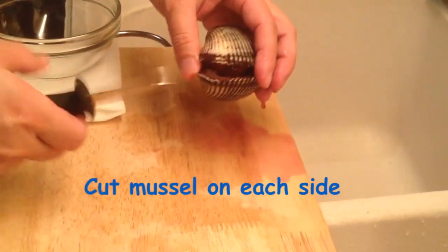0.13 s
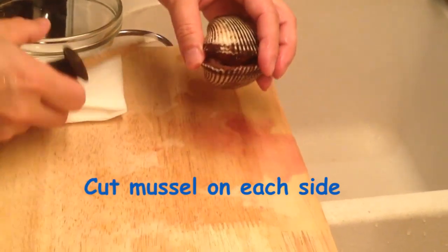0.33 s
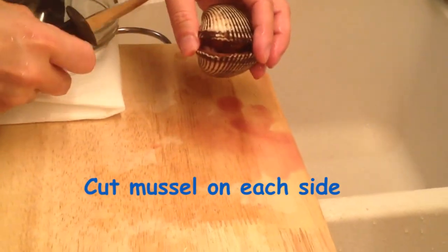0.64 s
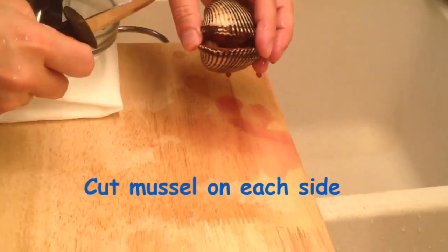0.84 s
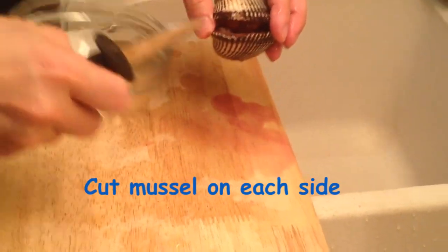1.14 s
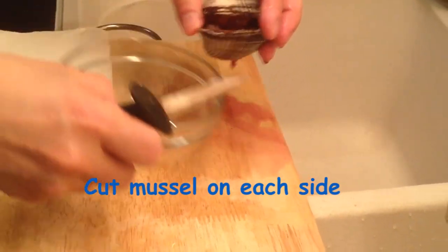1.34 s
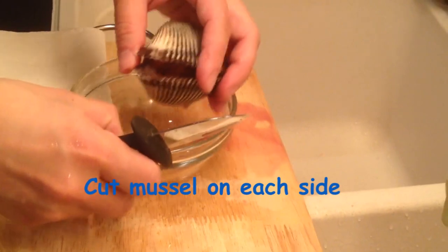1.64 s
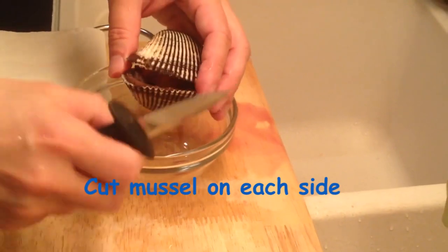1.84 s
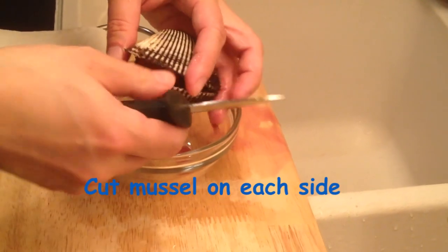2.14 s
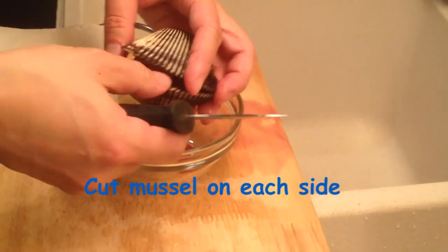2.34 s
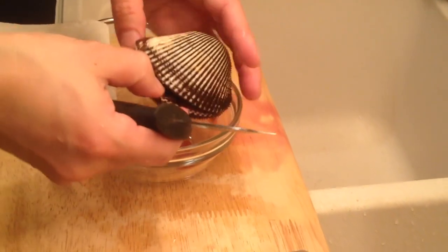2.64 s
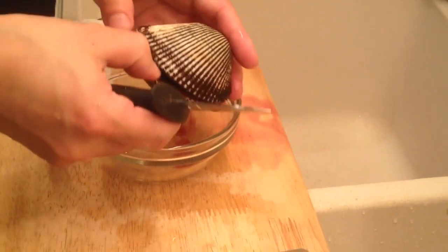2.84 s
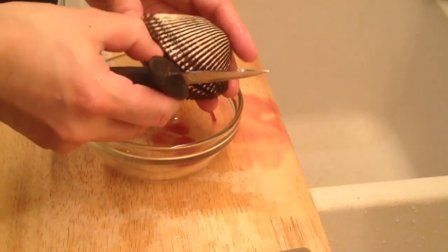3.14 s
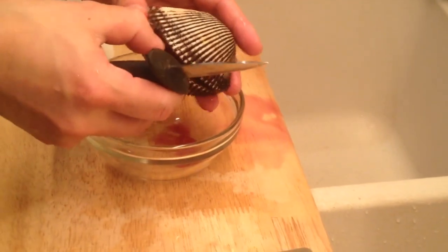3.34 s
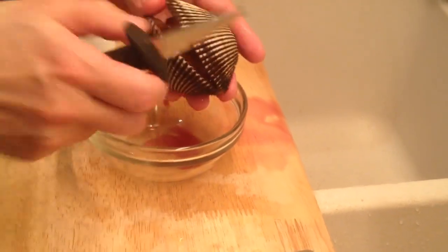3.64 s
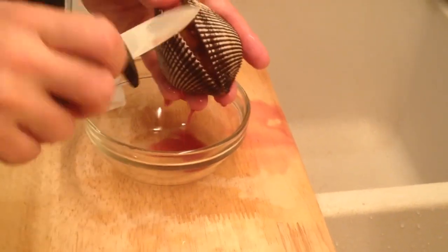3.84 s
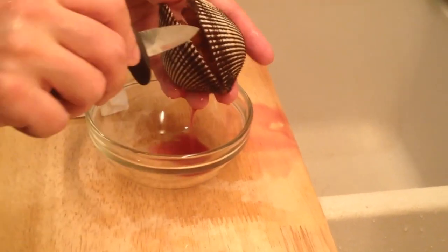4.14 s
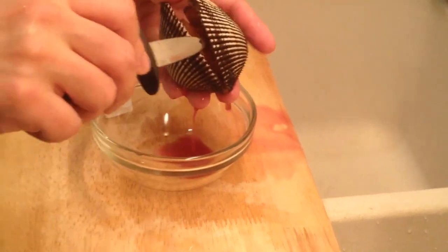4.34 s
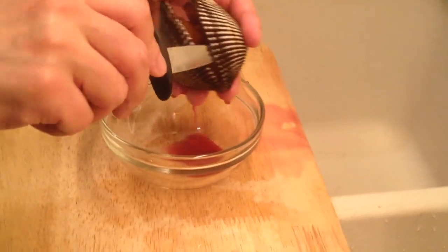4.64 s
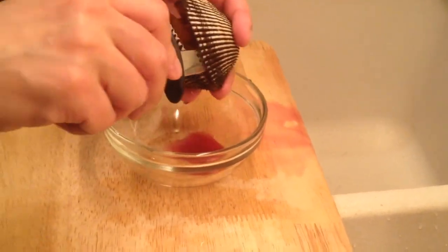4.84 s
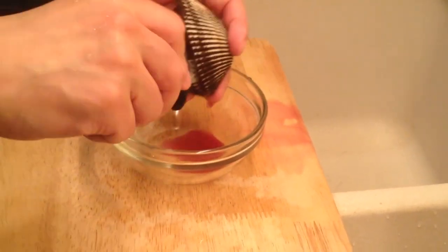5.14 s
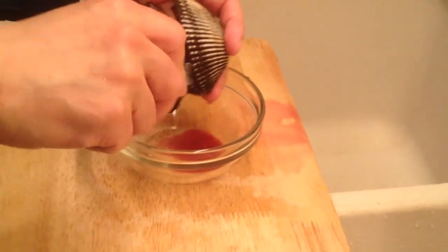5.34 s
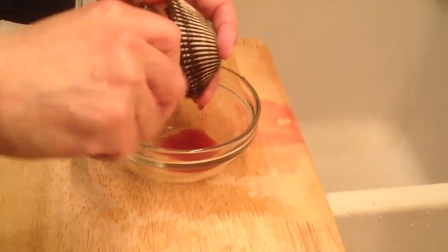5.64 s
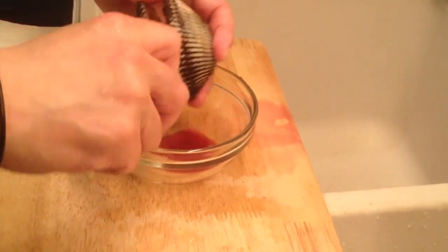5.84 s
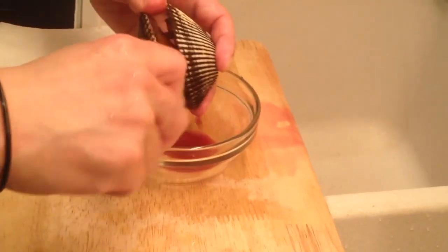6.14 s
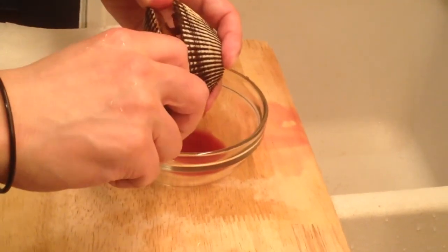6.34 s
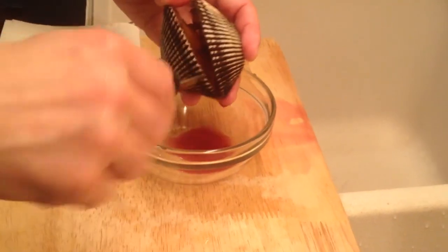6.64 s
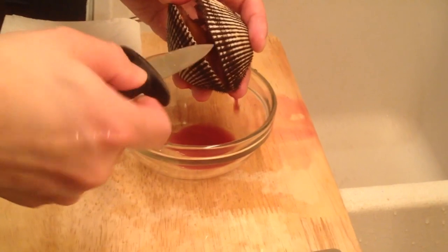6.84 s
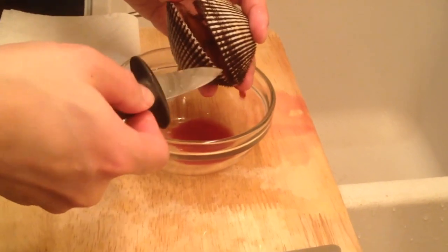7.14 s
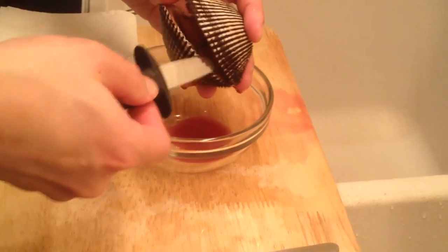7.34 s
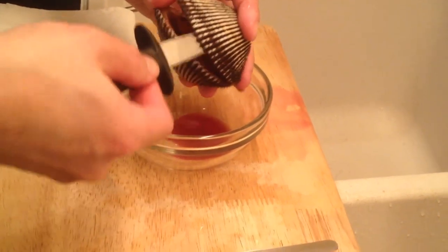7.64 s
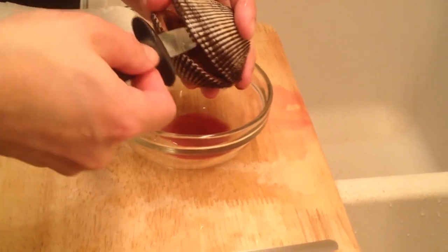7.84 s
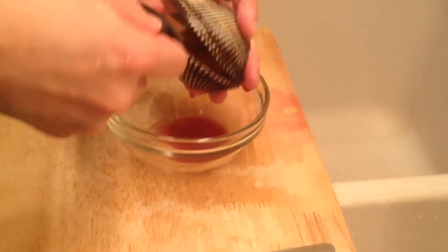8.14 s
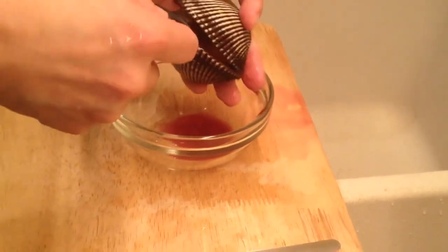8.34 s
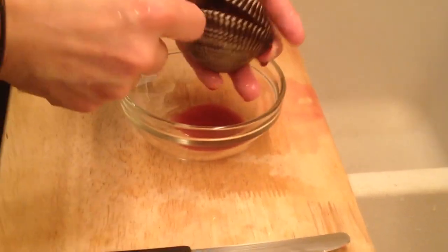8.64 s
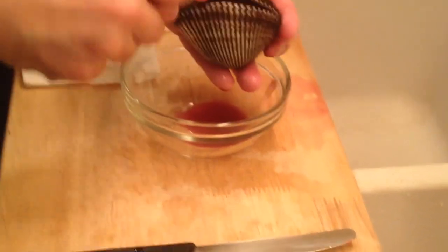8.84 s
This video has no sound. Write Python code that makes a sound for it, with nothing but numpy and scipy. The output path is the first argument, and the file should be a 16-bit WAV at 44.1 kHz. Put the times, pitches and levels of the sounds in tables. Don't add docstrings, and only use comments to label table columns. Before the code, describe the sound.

Small, dry, bright shell sounds heard close up over low room noise and a faint fridge whine. One click opens, two hard woody knocks follow, then near silence with tiny wet smacks. The knife scratches and snaps irregularly, slips loudly, and a duller knock follows. Slight squeaks precede the densest crunchy scrape, and a few hollow taps fade out. Short echoes return from hard kitchen walls.

```python
import sys
import numpy as np
from scipy import signal
from scipy.io import wavfile
from scipy.ndimage import uniform_filter1d

SR = 44100
rng = np.random.default_rng(int(sys.argv[2]) if len(sys.argv) > 2 else 0)


def ratio(d):
    e = np.asarray(d, float) / 20
    return 10 ** e


def bounce(signal):
    frames = np.transpose(np.atleast_2d(signal))
    limited = np.clip(frames, -1, 1)
    pcm = np.round(limited * 32767).astype(np.int16)
    wavfile.write(sys.argv[1], SR, pcm)


N = 396900


def evened(x):
    return x / np.sqrt(np.mean(x ** 2) + 1e-20)


def read(points, hz):
    f, value = np.transpose(points)
    return np.interp(np.log(hz + 1), np.log(f + 1), value)


def add(mix, s, sound):
    part = mix[..., round(s * SR):][..., :sound.shape[-1]]
    part += sound[..., :part.shape[-1]]


def filtered(x, order, hz, kind):
    return signal.sosfilt(signal.butter(order, hz, kind, fs=SR, output="sos"), x)


def resonate(x, hz, width):
    r = np.exp(-np.pi * max(width, 1) / SR)
    pole = r * np.exp(2j * np.pi * hz / SR)
    return np.sqrt(1 - r * r) * 2 * signal.lfilter([1], [1, -pole], x).real


def steep(x, hz, width):
    once = resonate(x, hz, width)
    twice = resonate(once, hz, width)
    return twice * np.linalg.norm(once) / np.linalg.norm(twice)


def colour(x, spectrum):
    hz = abs(np.fft.fftfreq(2048, 1 / SR))
    log_gain = np.log(ratio(read(spectrum, hz)) + 1e-5)
    response = np.fft.ifft(np.exp(np.conj(signal.hilbert(log_gain)))).real
    return signal.oaconvolve(x, response / np.linalg.norm(response))[:len(x)]


def waver(count, size):
    once = uniform_filter1d(rng.standard_normal(count), size=size)
    return evened(uniform_filter1d(once, size=size))


def grains(count, per_s, spread_db, smooth):
    draw = rng.random((count, 2))
    sizes = ratio(-spread_db * np.log(draw[:, 1] * .98 + .02))
    sparse = (draw[:, 0] < per_s / SR) * sizes
    return rng.standard_normal(count) * (smooth + evened(sparse))


def clumped(x, patchy_db):
    z = signal.stft(x, nperseg=256, noverlap=192)[2]
    patches = uniform_filter1d(rng.standard_normal(z.shape[::-1]).T, size=4, axis=0)
    patches = uniform_filter1d(patches, size=9, axis=1)
    return signal.istft(z * ratio(patchy_db * evened(patches)), nperseg=256, noverlap=192)[1][:N]


def stroke(db, swell, fade, blade_db):
    range_db = 20.0
    t = np.arange(-1.5 * swell, 1.5 * fade, 1 / SR)
    away = np.maximum(-t / swell, t / fade)
    level_db = db - range_db * away
    grit_db = -4.5 - 6 * np.maximum(t / fade, 0)
    levels = np.array([level_db, level_db + blade_db, level_db + grit_db])
    rub = evened(grains(count=len(t), per_s=1500, spread_db=1.0, smooth=0.93))
    return -t[0], rub * ratio(levels - 3.5)


def knife():
    # start in
    # seconds, shell level in dB, low ring and grit in dB relative to it, shell pitch in Hz
    catches = [(0.0532, -23.5, -25, -5, 3220), (0.4667, -46, -9, -8, 3500),
               (4.6668, -36, -15, -1, 4760), (4.6872, -41.5, -3, -20, 4400),
               (4.804, -39.5, -3, -6, 5900), (4.811, -43, -3, -1.5, 6300), (4.875, -40, -6, -19, 2960),
               (4.9031, -31.5, -9, -25, 2800), (4.9236, -34, -12, -19, 6460),
               (4.954, -36.5, -13, -9, 2760), (5.018, -47, -23, -0.5, 2900),
               (5.324, -28, -11, -3.5, 6500), (5.434, -28.5, -8, -14, 2700),
               (5.5547, -23.5, -13, -20, 6430), (5.6467, -31, 2.5, -9.5, 6530),
               (5.6997, -38.5, 3, -17, 4040), (5.777, -25.5, 3, -32.5, 2830),
               (5.9204, -32, -11.5, -11, 3150), (6.0457, -31.5, -9, -13.5, 2340),
               (6.1602, -33, -14, -10.5, 3080), (6.1645, -39.5, 3.5, -13, 3080),
               (6.183, -27, -24, -17, 2900), (6.208, -10, -15.5, -9, 3350),
               (6.2815, -34, -1.5, -11, 2950), (6.6288, -47.5, -7, -7, 4730),
               (7.0337, -48, -24, -14, 3450), (7.1065, -46.5, -21, -20, 3180),
                     (7.5477, -39.5, -35.5, -9, 3220), (7.576, -37.5, -15, -20.5, 3200),
                     (7.703, -34.5, -4, 3.5, 5900), (7.7442, -27, -2, -26, 3120),
                     (7.7683, -24.5, 4, -28, 3430), (7.8124, -23.5, -2, -28, 7500),
                     (8.0448, -20.5, 0.5, -26, 4340), (8.0602, -20, 6, -24, 4030),
                     (8.0747, -13.5, -8, -11, 3120), (8.0869, -20, -17, 0.5, 7050),
                     (8.0956, -14, -12, -22.5, 6850), (8.184, -22.5, -14, -2, 4870),
                     (8.3588, -33, -18, -23, 2600), (8.529, -33, -30, -4, 4900),
                     (8.555, -49, -20, -4, 4840), (8.7377, -35.5, -13.5, -8, 2400),
                     (8.821, -50.5, 4.5, -12, 2360), (8.4089, -21.5, -46, -18.5, 4310)]
    # time in seconds, pitch in Hz
    hollow = [(0.3, 2210), (4.66, 2126), (4.7, 1850), (4.9, 1850), (5.4, 1820), (5.64, 1758), (5.9, 1821),
              (7.76, 1790), (8.05, 1740), (8.085, 1763), (8.1, 1490), (8.53, 1374), (8.73, 2310),
              (8.82, 1235)]
    # hardest push in seconds, level in dB,
    # swell and fade in seconds, blade ring in dB relative to the level
    drags = [(0.472, -64.5, 0.0065, 0.71, -19), (4.6, -55, 0.035, 0.047, -6),
             (4.668, -47, 0.046, 0.091, -12), (4.812, -49, 0.034, 0.058, -10),
             (4.904, -46, 0.045, 0.12, -2.5), (5.138, -50, 0.081, 0.084, -2.5),
             (5.192, -44.5, 0.011, 0.065, -6.5), (5.342, -41.5, 0.021, 0.035, 2),
             (5.561, -46, 0.033, 0.0048, 0), (5.78, -42.5, 0.021, 0.07, 4.5), (6.163, -44, .016, 0.11, 5),
             (6.213, -29.5, 0.0098, 0.013, -13), (6.302, -56, .04, 0.011, 15),
             (7.034, -59, 0.011, 0.059, -19), (7.115, -46.5, 0.022, 0.081, -11),
             (7.25, -70, 0.21, 0.14, -2), (7.547, -51, 0.0046, 0.058, 6),
             (7.577, -46.5, 0.0058, 0.029, -15.5), (7.7, -54.5, 0.042, 0.15, -1.5),
             (7.746, -33, 0.0035, .05, -12), (7.791, -41.5, 0.049, 0.046, -2),
             (8.049, -32.5, 0.004, 0.024, 7), (8.093, -18.5, 0.024, 0.015, -34),
             (8.976, -56.5, 0.13, .1, -8)]
    # frequency in Hz, width in Hz, level in dB
    blade_modes = [(1790, 36, -11.5), (1850, 33, -10.5), (2300, 210, -12.5)]
    # frequency in Hz, level in dB per Hz
    shell_colour = [(900, -15.5), (1500, -15), (2100, -10.5), (2500, -21), (2950, -1), (3600, -15.5),
                    (4700, -4.5), (5600, -11.5), (6500, -2), (7200, -4.5), (7900, -8), (8900, -21),
                    (11000, -39.5), (16000, -46.5)]
    # frequency in Hz, level in dB per Hz
    grit_colour = [(6500, -13.5), (7800, -2.5), (8900, -12.5), (10500, -11.5), (13500, -13.5), (14600, -21),
                   (15600, -23.5), (16300, -38)]
    drive, spot = np.zeros((3, N)), np.zeros(N)
    t = np.arange(4000) / SR
    for s, db, low_db, grit_db, hz in catches:
        slip = evened(grains(count=len(t), per_s=2600, spread_db=0.0, smooth=2.7))
        slip = slip * np.minimum(t / 0.00038, 1) * ratio(db - 10.5 - 26 * t / 0.023)
        add(drive, s - .0004, slip * ratio(np.array([[0], [-99], [grit_db]])))
        add(spot, s - .0004, ratio(-5.5) * resonate(slip, hz, 220))
        low_hz = np.interp(s, *np.transpose(hollow))
        beat = 1 + 0.36 * np.cos(2 * np.pi * 115 * (t - .004))
        hum = np.sin(2 * np.pi * low_hz * t) * beat
        hum = hum + 0.26 * resonate(rng.standard_normal(len(t)), 1.01 * low_hz, 260)
        decay = np.exp(-(t / 0.011) ** 4) + 0.21 * np.exp(-t / 0.021)
        add(spot, s, ratio(db + low_db - 5.5) * hum * np.minimum(t / 0.0018, 1) * decay)
    for s, *row in drags:
        lead, rub = stroke(*row)
        add(drive, s - lead, rub)
    blade = sum(ratio(db) * resonate(drive[1], hz, width) for hz, width, db in blade_modes)
    shell = ratio(-3.0) * colour(drive[0], shell_colour)
    grit = ratio(2.0) * colour(drive[2], grit_colour)
    sound = clumped(shell + blade + grit, patchy_db=3.5)
    return filtered([sound, spot], 4, 1200, "high")


def ticks():
    # start in seconds, peak in dB, pitch in Hz
    snaps = [(.0559, -29, 6100), (4.5982, -40, 5000), (4.6559, -37, 5000), (4.6694, -33, 5000),
             (4.6869, -31, 4500), (4.814, -38, 8000), (4.8778, -42, 5000), (4.9226, -46, 6500),
             (4.9561, -36, 9000), (5.0192, -34, 7000), (5.079, -41, 7000), (5.1219, -41, 6000),
             (5.2142, -55, 6000), (5.3249, -28.5, 6500), (5.3636, -42, 5000), (5.4352, -67, 4000),
             (5.5554, -31.5, 6500), (5.648, -22, 5930), (5.7014, -42, 4000), (6.0513, -42.5, 6500),
             (6.1589, -38.5, 8000), (6.2763, -44, 6000), (6.2822, -28.5, 3500), (6.2849, -37, 4000),
             (7.1434, -41, 6000), (7.548, -44, 7000), (7.6943, -47, 5000), (7.7062, -32, 7000),
             (7.7331, -42, 6500), (7.7454, -25.5, 6000), (7.7704, -24.5, 8000), (7.7747, -25, 7500),
             (7.813, -27, 5000), (7.818, -29, 7000), (8.0469, -25.5, 5950), (8.0743, -14, 4000),
             (8.0837, -18, 4000), (8.0907, -12, 6000), (8.0989, -11, 6000), (8.18, -37, 4500),
             (8.184, -23.5, 6000), (8.4138, -23, 5000), (8.5355, -26.5, 6000), (8.5571, -28, 4500),
             (8.567, -33, 6000), (8.7506, -42.5, 4000), (8.963, -47.5, 7000), (8.9762, -40, 7000)]
    out, t = np.zeros(N), np.arange(400) / SR
    for s, db, hz in snaps:
        snap = np.cos(2 * np.pi * hz * t) + 0.79 * rng.standard_normal(len(t))
        snap = filtered(snap * np.exp(-t / 0.00021), 2, 2200, "high")
        add(out, s, ratio(db - 2.0) * snap / abs(snap).max())
    return out


def taps():
    # start in seconds, level in dB
    hits = [
        (0.0543, -42),
        (8.3562, -34),
        (8.4073, -25),
        (8.5307, -33),
        (8.7371, -41.5),
    ]
    # frequency in Hz, level in dB, T60 in seconds
    spots = [
        [(1960, -2.5, 0.18), (2950, -14, 0.081), (3550, -10, 5.0), (4080, 2, 0.1), (5265, -21, 0.34),
         (7047, 3, 0.072), (7250, -12, 0.11), (8430, -6, 0.036), (9220, -9, 0.027), (10310, -16, 0.18)],
        [(2660, 0, 0.034), (3460, -21, 0.034), (4100, -3.5, 0.03), (4800, -5, 0.023), (5060, -28, 0.18),
         (5534, -27, 0.026), (6697, -12, 0.021), (6842, -32, 5.0)],
        [(1040, -17, 0.095), (2250, -32, 5.0), (2596, -6, 0.11), (2880, -7, 0.19), (4020, -6, 0.044),
         (4940, -19, 0.15), (5615, -29, 0.51), (6067, -8, 0.41), (6519, -26, 0.36), (7140, -22, 0.029),
         (8048, -32, 0.052), (8748, -43, 0.67)],
        [(1380, -10, 0.1), (2750, -4.5, 0.038), (4400, -3, 0.02), (4721, -9, 0.062), (4800, -12, 0.045),
         (6300, -1.5, 0.024), (7090, -9, 0.077), (7700, -6, 0.099), (8250, -7, 0.019), (8942, -20, 0.056)],
        [(1240, -7.5, 0.072), (1630, -6, 0.042), (1960, -16, 0.15), (2330, 4.5, 0.073), (2600, -11, 0.067),
         (4030, -3.5, 0.092), (5840, -25, 0.11), (8909, -12, 0.039)],
    ]
    damped_t60 = .055
    out, t = np.zeros(N), np.arange(6000) / SR
    for (s, db), modes in zip(hits, spots):
        for hz, mode_db, t60 in modes:
            flutter = 0.5 * waver(count=len(t), size=60)
            ring = np.sin(2 * np.pi * hz * t) + flutter * np.cos(2 * np.pi * hz * t)
            decay = ratio(db + mode_db - 70 * t / min(t60, damped_t60))
            add(out, s, decay * np.minimum(t / 0.00035, 1) * ring)
    return out


def wet():
    # start in seconds, level in dB,
    # frequency in Hz, width in Hz, length in seconds
    smacks = [(0.371, -70.5, 10550, 1200, 0.06), (.392, -69.5, 8050, 3000, 0.0078),
              (2.122, -67, 3980, 1200, 0.0051), (2.239, -71, 6200, 890, 0.012),
              (2.242, -63.5, 1790, 200, 0.0074), (2.378, -65, 1810, 198, 0.0089),
              (2.443, -74, 12030, 4000, 0.0073), (3.124, -68.5, 6200, 1193, 0.016),
              (3.341, -67, 6370, 1200, 0.0086), (3.35, -69, 10300, 3000, 0.01),
              (3.388, -71.5, 6500, 1490, 0.0051), (3.773, -72, 6980, 3040, 0.0086),
              (4.392, -53.5, 5500, 1400, 0.0065), (4.395, -70.5, 12000, 5030, 0.0063),
              (6.548, -50.5, 2896, 121.6, 0.015), (6.55, -65, 5900, 4150, 0.017),
              (7.439, -59.5, 3010, 250, 0.038)]
    crack_s = (.054, 3.12, 4.89, 6.185, 6.2075, 7.105, 7.11, 8.022, 8.085, 8.087, 8.3, 8.556, 8.567, 8.737,
               8.97)
    # level in dB, frequency in Hz, width in
    # Hz, length in seconds
    cracks = [(-43, 7600, 600, 0.0049), (-65.5, 1750, 220, .012), (-53.5, 2050, 470, 0.15),
              (-38, 2950, 410, 0.0072), (-29, 3400, 630, 0.0047), (-55, 3080, 230, 0.033),
              (-60, 1970, 250, 0.035), (-60, 3900, 4700, 0.025), (-38, 1000, 800, 0.0094),
              (-26.5, 7030, 700, 0.015), (-60.5, 6600, 1100, 0.011), (-41, 4900, 5500, 0.0018),
              (-49.5, 7300, 4200, 0.0016), (-50.5, 1440, 1300, 0.015), (-72, 11000, 1550, 0.014)]
    # time in seconds, pitch in Hz, level in dB
    squeak = [
        (6.88, 4720, -81.5),
        (6.999, 5070, -77),
        (7.05, 5050, -87),
        (7.12, 5120, -63),
        (7.25, 5430, -78),
        (7.3, 5240, -79),
        (7.39, 5250, -69),
        (7.41, 5100, -87),
    ]
    out, t = np.zeros(N), np.arange(3000) / SR
    for s, db, hz, width, length in smacks + [(s, *row) for s, row in zip(crack_s, cracks)]:
        puff = rng.standard_normal(len(t)) * np.minimum(t / 0.00059, 1) * np.exp(-(t / length) ** 2)
        add(out, s, ratio(db) * steep(puff, hz, width))
    s, hz, db = np.transpose(squeak)
    t = np.arange(s[0], s[-1], 1 / SR)
    flutter = 1 + 0.66 * waver(count=len(t), size=500)
    tone = flutter * np.sin(2 * np.pi * np.cumsum(np.interp(t, s, hz)) / SR)
    level = ratio(np.interp(t, s, db) + 3.0)
    add(out, s[0], level * tone * signal.windows.tukey(len(t), .15))
    return out


def knocks():
    # start in seconds, level in dB, rebound delay in seconds, rebound in dB, ring in dB
    blows = [
        (1.548, -11.5, 0.0048, 0, -10),
        (1.876, -7.5, 0.0055, -2.5, -12.5),
        (6.315, -15, 0.006, 0, -11),
    ]
    # frequency in Hz, level in dB, T60 in seconds
    rings = [
        [(276, -7.5, 0.208), (541, -2.5, 0.25), (685, -17.5, 0.37), (923, -10.5, 0.21), (947, -8.5, 0.15),
         (1251, -4.5, 0.316), (1386, -20.5, 0.46), (1506, -16.5, 0.32), (1542, -11, 0.29), (1930, -20, 0.27),
         (2193, -4, 0.12), (2573, -16, 0.2), (2890, -18.5, 0.22), (3025, -12.5, 0.17)],
        [(593.6, -10, 0.368), (782.5, -3, 0.1478), (1059, -8, 0.3), (1100, -4.5, 0.22), (1410, -7.5, 0.24),
         (1550, -10.5, .22), (1540, -19.5, 0.23), (2032, -17.5, 0.3), (2130, -9, 0.19), (2230, -9, 0.122),
         (2806, -6.5, 0.077)],
        [(277, -11.5, 0.34), (601, -1, 0.23), (720, -19, 0.51), (936, 5, 0.18), (1130, -2, 0.11),
         (1394, -5, 0.23), (1534, -3.5, 0.3), (1770, -18, 0.35), (2190, -23, 0.22)],
    ]
    # frequency in Hz, level in dB per Hz
    thuds = [
        [(70, -39), (190, -10), (400, -11), (600, -4.5), (1000, 2.5), (2430, -12), (2770, -10), (3590, -22),
         (7980, -33), (14000, -52)],
        [(47, -47.5), (80, -29.5), (212, 0), (379, -5), (1270, 2.5), (2090, -6), (2330, -13), (2890, -11),
         (3510, -23), (14000, -54.5)],
        [(47, -55), (210, -7.5), (400, -12.5), (580, -5), (960, -6.5), (2180, -9.5), (2430, -20), (2830, -15),
         (3510, -29.5), (14000, -50.5)],
    ]
    board_hz = (238, 575, 1258)
    board_db = [
        (-13.5, -8.5, -29),
        (-6.5, -6.5, -11),
        (-27, -4, -8),
    ]
    board_t60 = (0.16, 0.12, 0.47)
    lead_s, rebound_lead_s, rattle_s = .0008, .002, .003
    out, t = np.zeros(N), np.arange(SR // 2) / SR
    for (s, db, delay, rebound_db, ring_db), modes, thud, board in zip(blows, rings, thuds, board_db):
        modes = modes + list(zip(board_hz, np.add(board, 4.0), board_t60))
        ring = np.zeros(len(t))
        for hz, mode_db, t60 in modes:
            tone = np.sin(2 * np.pi * (hz * t + rng.random()))
            ring += ratio(mode_db - 75 * t / t60) * tone * (1 + 0.17 * waver(count=len(t), size=400))
        add(out, s - lead_s, ratio(db + ring_db) * ring * np.minimum(t / 0.002, 1))
        parts = [(-lead_s, 3.0, .016, 1900),
                 (delay - rebound_lead_s, rebound_db + 4.0, .03, 15000),
                 (rattle_s, -8.0, .13, 15000)]
        for start, level_db, t60, top_hz in parts:
            burst = rng.standard_normal(len(t)) * ratio(-60 * t / t60)
            burst = filtered(burst, 2, top_hz, "low")
            add(out, s + start, ratio(db + level_db) * colour(burst, thud))
    return filtered(out, 3, 110, "high")


def kitchen(x):
    # frequency in Hz, T60 in seconds
    decay = [(150, 0.44), (500, 0.2834), (1200, 0.277), (2500, 0.25), (6000, 0.25), (14000, 0.24)]
    walls = np.zeros(SR // 2)
    at = np.arange(140, len(walls) - 20, 20)
    walls[at + rng.integers(0, 20, len(at))] = rng.choice([-1., 1.], len(at))
    hz, t, z = signal.stft(walls, SR, nperseg=256)
    tail = signal.istft(z * ratio(-60 * t / read(decay, hz)[:, None]), SR, nperseg=256)[1]
    return signal.fftconvolve(x, tail / np.linalg.norm(tail))[:N]


def room_noise():
    # frequency in Hz, level in dB per Hz
    air_colour = [(20, -34.5), (55, -47.5), (90, -12), (130, -15.5), (280, -9), (500, -12), (1000, -16.5),
                  (2400, -27), (3800, -33.5), (7000, -36.5), (10000, -42.5), (13500, -38.5), (15500, -39.5),
                  (16400, -45.5)]
    # frequency in Hz, level in dB, width in Hz
    whine_bands = [(144.6, -77, 15), (302.8, -72, 20), (391, -66, 12), (529.5, -74, 13), (573, -73.5, 4.9),
                   (2326, -79.5, 10), (2730, -70.5, 42), (4500, -90, 10)]
    air_db, hum_hz, hum_db = -55.5, 389.8, -62.5
    frames, hz = N // 512 + 5, np.fft.rfftfreq(2048, 1 / SR)
    a, b, patches = rng.standard_normal((frames, 1025, 3)).T
    patches = uniform_filter1d(patches, size=20, axis=0)
    patches = evened(uniform_filter1d(patches, size=8, axis=1))
    z = (a + 1j * b) * ratio(read(air_colour, hz)[:, None] + 0.29 * patches)
    air = signal.istft(z, nperseg=2048, noverlap=1536)[1][:N]
    whines = np.zeros(N)
    for f, db, width in whine_bands:
        once = resonate(rng.standard_normal(N), f, width)
        whines += ratio(db) * evened(resonate(once, f, width))
    hum = ratio(hum_db) * np.sin(2 * np.pi * hum_hz * np.arange(N) / SR)
    return ratio(air_db - 2.5) * evened(air) + whines + hum


def scene():
    rub, spot = knife()
    small = ticks() + taps() + wet()
    dull = knocks()
    source = ratio(-5.5) * rub + ratio(-9.0) * spot + ratio(-6.0) * small + ratio(-9.5) * dull
    turn = 2 * np.pi * np.arange(N) / SR * 2.3
    echoes = np.zeros(N)
    for k in range(3):
        echoes += kitchen(source * np.cos(turn + k * np.pi / 3) * np.sqrt(2 / 3))
    return (rub + spot + small + dull + echoes + room_noise())[None]


def top_cut(x):
    return signal.sosfilt(signal.butter(12, 15750, fs=SR, output="sos"), x)


def record(dry):
    ceiling = .9
    limited = ceiling * np.tanh(dry / ceiling)
    return top_cut(filtered(limited, 2, 60, "high"))


dry = scene()
out = record(dry)
bounce(out)
```